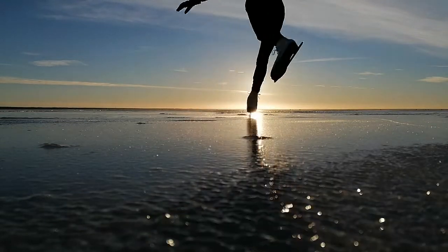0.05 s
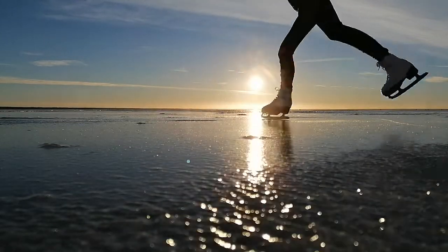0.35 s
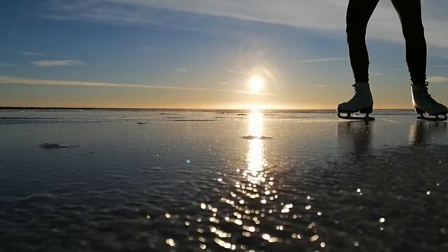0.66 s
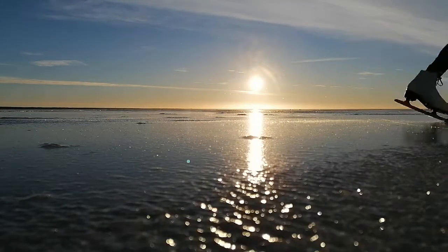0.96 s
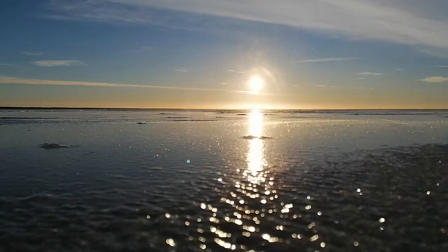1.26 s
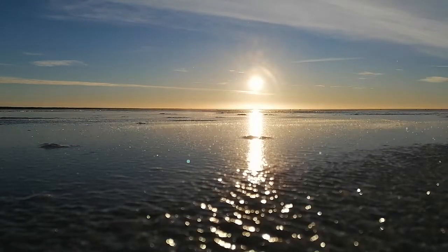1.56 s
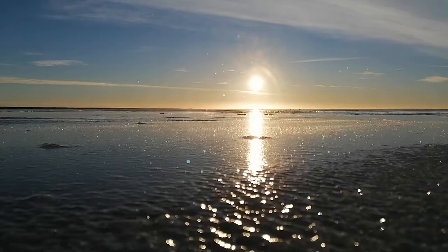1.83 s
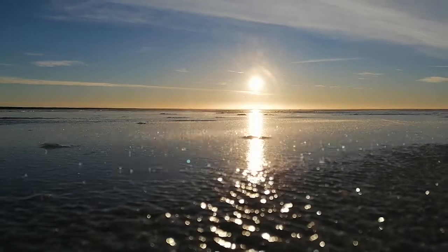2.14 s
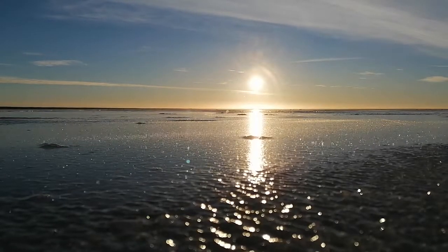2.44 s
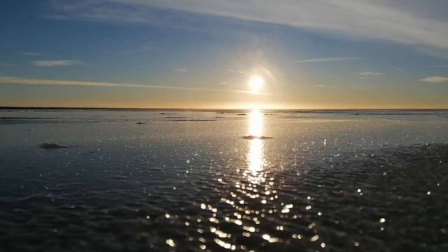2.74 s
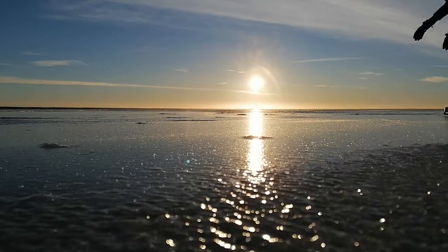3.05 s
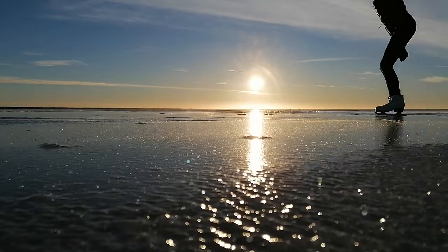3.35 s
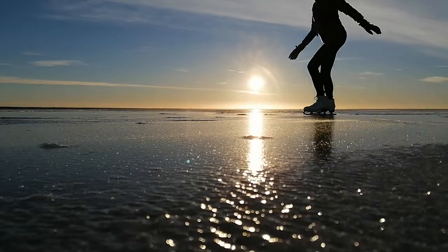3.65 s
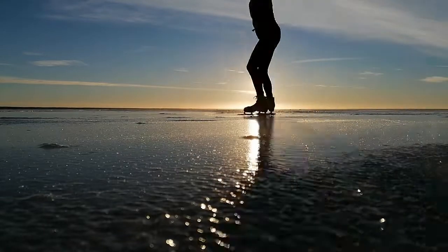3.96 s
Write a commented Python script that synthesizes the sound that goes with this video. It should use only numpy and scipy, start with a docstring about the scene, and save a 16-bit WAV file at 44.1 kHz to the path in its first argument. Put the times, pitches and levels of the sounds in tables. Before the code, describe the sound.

Ice skate blades hiss, scrape and crackle over thin ice, with light wind rumble.

```python
"""Skater on thin bay ice

A stereo camera lies on the ice. A skater glides past, steps round close behind it and glides back in
front. The blades hiss over the grainy surface, scrape at each push and ring with friction; the sheet
cracks, thuds and booms under the edges. Light wind rumbles on the microphones."""
import sys
import numpy as np
from scipy import signal
from scipy.fft import rfft, irfft
from scipy.io import wavfile
from scipy.ndimage import uniform_filter1d

SR = 44100
rng = np.random.default_rng(int(sys.argv[2]) if len(sys.argv) > 2 else 0)


def dump_mix(stems):
    """Bounce the given channels to the path in sys.argv[1] as a 16-bit WAV at rate SR."""
    frames = np.atleast_2d(stems).T  # one column per channel
    limited = np.clip(frames, -1, 1)  # hard clip at full scale
    pcm = np.round(limited * 32767).astype(np.int16)
    wavfile.write(sys.argv[1], SR, pcm)


N = 176400

# rise time/s of breaking ice in each band: thud, knock, crack, snap
RISE_S = [0.0032, 0.0011, 0.00055, 0.0012]
THUD_DB = -15.5  # the sheet's thud, relative to the knock
FRAMES = dict(nperseg=512, noverlap=384)


def cracks(size=4096):
    """Ice cracks under a blade: a burst of a few milliseconds with two smaller splinters behind it."""
    # t/s, crack level/dB, knock level/dB, snap level/dB
    breaks = [(0.5055, -35, -55, -32), (0.5202, -30.5, -59, -42), (0.666, -30, -42, -55),
              (0.7251, -28, -35, -49), (1.4744, -37, -33.5, -38), (1.497, -31, -35, -36),
              (1.5755, -33, -35, -36), (1.641, -16, -26, -31), (1.6555, -19, -25, -31),
              (1.7, -23, -44, -41), (1.7145, -24, -35, -48), (1.7444, -20, -26, -35.5),
              (1.76, -31, -28, -40.5), (1.8057, -21, -18.5, -38.5), (1.9032, -27, -25, -40),
              (1.947, -25, -24.5, -32), (1.9865, -23, -22.5, -34.5), (2.0236, -28.5, -27.5, -46),
              (2.0597, -28, -38, -41.5), (2.1459, -23.5, -27, -41.5), (2.209, -33, -32.5, -57),
              (2.2546, -24, -21.5, -39.5), (2.3999, -17, -23, -27.5), (2.4035, -20, -36, -35),
              (2.5692, -30.5, -34, -32), (2.6525, -32.5, -28.5, -36), (2.7352, -25, -54, -33),
              (2.7634, -33, -29, -42), (2.806, -31, -34.5, -39), (3.1869, -31.5, -24, -58.5),
              (3.76, -33.5, -40, -80)]
    out, gains = np.zeros(N), ice_bands(size)
    t = (np.arange(size) - size // 4) / SR
    for s, crack_db, knock_db, snap_db in breaks:
        noise = rng.standard_normal(size)
        resonances = hollow(size)
        splinters_s = 0.00484 * np.cumsum(rng.uniform(0.44, 1, size=2))
        levels = knock_db + THUD_DB, knock_db, crack_db, snap_db
        for db, gain, rise in zip(levels, gains, RISE_S):
            shape = burst(t, rise) + amp(-18) * sum(burst(t - delay, rise) for delay in splinters_s)
            crack = irfft(rfft(noise * shape) * gain * resonances)
            add(out, s + t[0], sized(crack, db))
    return out


def glide(likeness=0.62):
    """The running blade crushes grains and chatters over rippled ice, partly alike in both channels."""
    # t/s, grinding level/dB, hiss level/dB, fizz level/dB
    glide_levels = [(0, -64, -71, -78.5), (.2, -55, -61, -71), (.38, -57.5, -55.5, -64),
                    (.47, -56, -46, -56.5), (.52, -49.5, -44.5, -43), (.62, -48, -45, -50),
                    (.74, -46.5, -39.5, -54), (.81, -52, -47.5, -50.5), (.87, -57, -55, -59.5),
                    (.98, -56, -46.5, -48.5), (1.07, -52, -49.5, -58.5), (1.25, -56.5, -44.5, -58),
                    (1.3, -52.5, -37.5, -46), (1.43, -55.5, -58, -58.5), (1.62, -52, -65, -60.5),
                    (1.96, -49.5, -59.5, -64), (2.32, -57, -66, -70), (2.5, -51, -64, -51),
                    (2.79, -52.5, -53, -73), (2.85, -56, -66.5, -73.5), (3.1, -58, -68, -76),
                    (3.27, -55, -54.5, -70.5), (3.41, -60, -56.5, -70), (3.5, -62, -66, -75),
                    (3.66, -59, -62, -77), (3.8, -55.5, -47, -65.5), (4, -64, -62, -72)]
    grip = chatter(N, depth_db=2, length_s=0.012)
    left, unrelated = rfft(grit(N) * grip), rfft(grit(N) * grip)
    pair = np.array([left, likeness * left + np.sqrt(1 - likeness ** 2) * unrelated])
    grinding, hiss, fizz = follow(glide_levels, np.arange(N) / SR)
    levels = grinding, grinding, hiss, fizz  # grinding also drives the sheet's low drone
    return sum(amp(db) * unit_rms(irfft(pair * gain, N)) for db, gain in zip(levels, ice_bands(N)))


def scrapes(size=16384):
    """An edge bites: a dense, clumpy run of grains swells and dies."""
    # peak t/s, swell/s, crack level/dB, knock level/dB, snap level/dB
    bites = [(1.009, 0.0047, -28, -30.5, -42), (1.35, 0.0036, -30.5, -30.5, -38.5),
             (1.373, 0.0058, -23, -31.5, -33), (1.704, 0.0094, -43, -33, -39.5),
             (1.73, 0.0074, -43, -46, -48), (1.859, 0.0055, -46, -35, -56), (2.232, 0.011, -39, -38, -44),
             (2.28, 0.0026, -52, -41, -39.5), (2.374, 0.014, -36.5, -40.5, -39.5),
             (2.728, 0.0087, -50, -48.5, -44), (2.772, 0.02, -40, -45, -48.5)]
    out, gains = np.zeros(N), ice_bands(size)
    t = (np.arange(size) - size // 2) / SR
    for s, swell_s, crack_db, knock_db, snap_db in bites:
        swell = np.exp(-abs(t) / swell_s)
        spectrum = rfft(grit(size, hiss=1.3) * swell * chatter(size, depth_db=4, length_s=0.004))
        levels = knock_db + THUD_DB, knock_db, crack_db, snap_db
        scrape = sum(amp(db) * unit_rms(irfft(spectrum * gain)) for db, gain in zip(levels, gains))
        add(out, s + t[0], scrape * np.sqrt(np.mean(swell ** 2)))
    return out


def blade_ring(damping_hz=140):
    """Friction keeps the loaded steel ringing; its pitch wanders as the contact point moves."""
    # blade modes: f/Hz, relative level/dB
    modes = [(1480, -0.5), (2180, 0), (2950, -14.5), (5250, -15), (7940, -12), (9300, -9.5)]
    # peak t/s, swell/s, level/dB, gain on all but the strongest mode/dB
    edge_loads = [(.17, .09, -62.5, -10.5), (.67, 0.079, -46, -7), (.95, .03, -43.5, -28),
                  (1.372, 0.0067, -20, 2.5), (3.8, 0.077, -56, -17)]
    t = np.arange(N) / SR
    pole = np.exp(-np.pi * damping_hz / SR)
    wandering_t = np.cumsum(chatter(N, depth_db=0.1238, length_s=0.16)) / SR  # pitch strays about 1.4 %
    rings = []
    for hz, db in modes:
        friction = rng.standard_normal(N) + 1j * rng.standard_normal(N)
        envelope = signal.lfilter([1], np.poly([pole, pole]), friction)
        ring = envelope * np.exp(2j * np.pi * hz * wandering_t)
        rings.append(amp(db) * unit_rms(ring.real))
    strongest = rings[1]
    others = sum(rings) - strongest
    return sum(amp(db) * swelled(strongest + amp(others_db) * others, t - s, swell_s)
               for s, swell_s, db, others_db in edge_loads)


def booms(size=16384):
    """The sheet bends under the skater's weight with a low, hollow swell."""
    # peak t/s, swell/s, f/Hz, level/dB
    bends = [(0.726, 0.003, 266, -30.5), (1.643, 0.0025, 490, -17), (1.735, 0.023, 526, -38),
             (1.787, 0.012, 165, -38.5), (2.255, 0.0093, 213, -34.5), (2.401, 0.0071, 166, -30.5),
             (2.762, 0.011, 240, -35), (3.69, 0.026, 284, -40)]
    out, hz = np.zeros(N), np.fft.rfftfreq(size, 1 / SR)
    t = (np.arange(size) - size // 2) / SR
    for s, swell_s, pitch_hz, db in bends:
        body = np.exp(-np.log2((hz + 1) / pitch_hz) ** 2)
        boom = irfft(rfft(rng.standard_normal(size)) * body)
        add(out, s + t[0], amp(db) * swelled(boom, t, swell_s))
    return out


def chips(per_s=220, from_s=1.67, to_s=2.8, size=1024):
    """Flakes snap off in clusters as the skater steps round; single ticks, mostly faint, sound apart."""
    # single ticks: t/s, level/dB
    single_ticks = [(.489, -38.5), (1.506, -32), (1.564, -35.5), (2.877, -50.5), (2.929, -60),
                    (3.213, -45.5), (3.409, -48.5), (3.697, -62)]
    t = np.arange(N) / SR
    ticks = (rng.random(N) < per_s / SR) * amp(6 * np.minimum(rng.exponential(1, N), 2))
    ticks *= (t > from_s) * (t < to_s) * chatter(N, depth_db=4, length_s=0.012)
    shape = burst(t[:size], RISE_S[2])
    crackle = signal.oaconvolve(ticks, shape)[:N] * rng.standard_normal(N)
    *_, crack, snap = ice_bands(N)
    out = amp(-50.5) * unit_rms(irfft(rfft(crackle) * (crack + 2 * snap), N))
    *_, crack, snap = ice_bands(size)
    for s, db in single_ticks:
        click = np.roll(shape, size // 2) * rng.standard_normal(size)
        tick = irfft(rfft(click) * (crack / 2 + 2 * snap))
        add(out, s - t[size // 2], sized(tick, db))
    return out


def ice_bands(size, low_cut_hz=130):
    """The colour of the ice as four spectral gains, low to high: thud, knock, crack and snap."""
    # f/Hz, level/dB
    colour = [(70, -34), (150, -3.5), (430, -1), (880, 5.5), (1300, -5), (1750, 3), (2300, 3), (2800, 1),
              (3350, -14), (4400, -21.5), (5200, -19.5), (7700, -19.5), (8520, -24), (9260, -19),
              (10100, -30.5), (15000, -67)]
    # crossovers between the bands: f/Hz
    edges = [422, 1148, 3610]
    hz = np.fft.rfftfreq(size, 1 / SR)
    above = [1 / (1 + (edge / (hz + 1)) ** 10) for edge in edges]
    low_cut = 1 / (1 + (low_cut_hz / (hz + 1)) ** 6)
    shares = [low_cut * (1 - above[0]), above[0] * (1 - above[1]), above[1] * (1 - above[2]), above[2]]
    return amp(spectrum_db(colour, hz)) * np.array(shares)


def grit(size, hiss=1, grains_per_s=3000):
    """Ice grains of uneven size break under steel, over a smooth hiss."""
    grains = (rng.random(size) < grains_per_s / SR) * rng.choice([-1, 1], size)
    strength = amp(4 * np.minimum(rng.exponential(1, size), 4))
    return unit_rms(unit_rms(grains * strength) + hiss * rng.standard_normal(size))


def chatter(size, depth_db, length_s):
    """The uneven grip of steel on rippled ice, as a factor wavering around one."""
    width = int(length_s * SR)
    ripple = uniform_filter1d(rng.standard_normal(size), width)
    return amp(depth_db * unit_rms(uniform_filter1d(ripple, width // 2)))


def hollow(size, depth_db=3, width_hz=448):
    """Every crack excites its own broad resonances: random peaks and dips across the spectrum."""
    ripple = uniform_filter1d(rng.standard_normal(size // 2 + 1), int(width_hz * size / SR))
    return amp(depth_db * unit_rms(ripple))


def drift(x, depth_db=3, width_hz=450, length_s=0.16):
    """The colour shifts in slow, narrow patches as the blade turns."""
    hz, t, spectra = signal.stft(x, SR, **FRAMES)
    patches = uniform_filter1d(rng.standard_normal((len(t), len(hz))), int(length_s / t[1]), axis=0)
    patches = unit_rms(uniform_filter1d(patches, int(width_hz / hz[1]), axis=1))
    return signal.istft(spectra * amp(depth_db * patches.T), SR, **FRAMES)[1][..., :N]


def scatter(x, t60_s=0.018, tail_db=-7):
    """The ice sheet carries a short diffuse tail to each microphone."""
    t = np.arange(8192) / SR
    tail = rng.standard_normal((2, len(t))) * amp(-60 * t / t60_s)
    tail /= np.linalg.norm(tail[0])
    return x + amp(tail_db) * signal.oaconvolve(x[None], tail, axes=1)[:, :N]


def microphones(x, side_lag_s=0.00031, top_hz=10500):
    """As the skater circles, the camera body colours and delays each side and lifts or shades the top."""
    # skater's path: t/s, offset to the side (0-1), gain above top_hz/dB
    path = [(0, 0.01, 17.5), (.7, 0.29, 13.5), (1.35, 0.89, 9.5), (2.2, 0.93, -15), (2.6, 0.91, -29),
            (2.9, 0.85, 13.5), (3.75, 0.41, 20.5)]
    # skater fully to the side: f/Hz, left minus right level/dB
    balance = [(60, -10), (130, -2.5), (290, -2.5), (640, -7), (1410, 5), (3100, 11), (6820, 11.5),
               (15000, 6)]
    hz, t, spectra = signal.stft(x, SR, **FRAMES)
    hz = hz[:, None]
    side, top_db = follow(path, t)
    tilt = amp(spectrum_db(balance, hz) * side / 2)
    lag = np.exp(-1j * np.pi * hz * side_lag_s * side)
    pair = np.array([tilt * lag, 1 / (tilt * lag)]) / np.sqrt((tilt ** 2 + tilt ** -2) / 2)
    top_gain = amp(top_db / (1 + (top_hz / (hz + 1)) ** 20))
    return signal.istft(spectra * pair * top_gain, SR, **FRAMES)[1][:, :N]


def wind():
    """Low buffeting, unrelated at the two microphones."""
    # t/s, level/dB
    gusts = [(0, -49.5), (.3, -50.5), (1.2, -60.5), (1.9, -52.5), (3.5, -50), (3.85, -39)]
    # f/Hz, relative level/dB
    colour = [(20, -0.5), (60, 2.5), (120, -0.5), (250, -15.5), (600, -22), (3000, -53)]
    gain = amp(spectrum_db(colour, np.fft.rfftfreq(N, 1 / SR)))
    rumble = unit_rms(irfft(rfft(rng.standard_normal((2, N))) * gain, N))
    return amp(follow(gusts, np.arange(N) / SR)[0]) * rumble


def amp(db):
    """Decibels to gain."""
    return 10 ** (np.asarray(db) / 20)


def unit_rms(x):
    """Scales to unit rms."""
    return x / np.sqrt(np.mean(x ** 2) + 1e-30)


def spectrum_db(points, hz):
    """Reads a spectrum on a log-frequency axis."""
    f, db = np.transpose(points)
    return np.interp(np.log(hz + 1), np.log(f + 1), db)


def follow(table, t):
    """Reads every column of a curve at the times t."""
    s, *columns = np.transpose(table)
    return [np.interp(t, s, column) for column in columns]


def add(mix, s, sound):
    """Mixes a sound in at s seconds."""
    part = mix[max(round(s * SR), 0):][:len(sound)]
    part += sound[:len(part)]


def burst(t, rise_s):
    """An envelope that peaks after its rise time, then dies away."""
    u = np.maximum(t, 0) / rise_s
    return u * np.exp(-u)


def sized(x, db):
    """Gives a short sound the energy of 1.8 ms at this level."""
    return amp(db) * unit_rms(x) * np.sqrt(.0018 * SR / len(x))


def swelled(x, t, swell_s):
    """Fades a sound in and out around t = 0, with unit rms at the top."""
    swell = np.exp(-.5 * (t / swell_s) ** 2)
    return unit_rms(x * swell) * np.sqrt(np.mean(swell ** 2))


def scene():
    """Skates and ice heard from the surface, with wind on the microphones."""
    ice = scatter(cracks() + drift(chips()) + booms() + scrapes())
    return microphones(ice + drift(glide()) + blade_ring()) + wind()


def record(dry):
    """The recorder cuts off above 15.4 kHz."""
    low_pass = signal.firwin(511, 15400, window=("kaiser", 9), fs=SR)
    return signal.oaconvolve(dry, low_pass[None], "same")


dry = scene()
out = record(dry)
dump_mix(out)
```